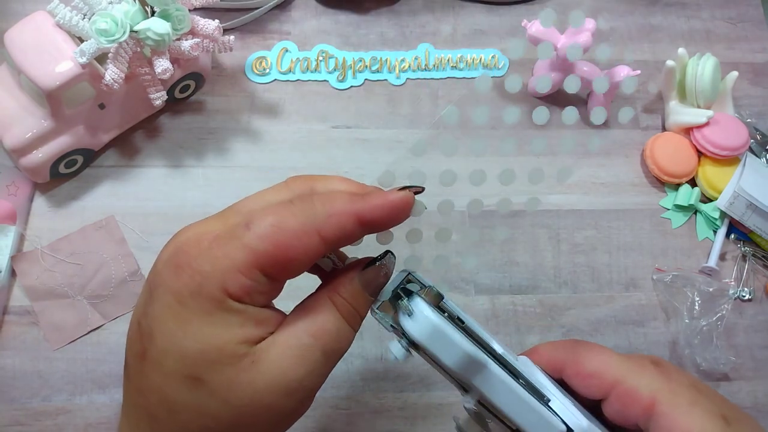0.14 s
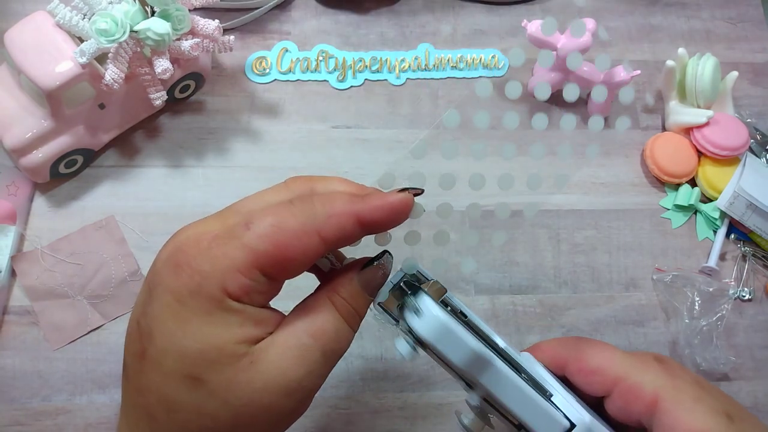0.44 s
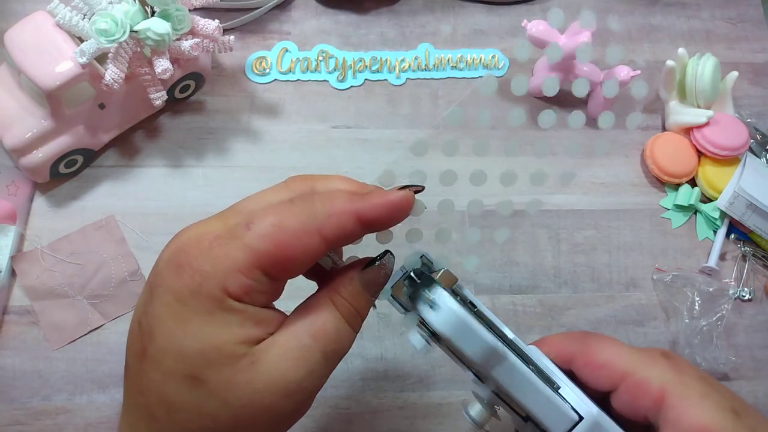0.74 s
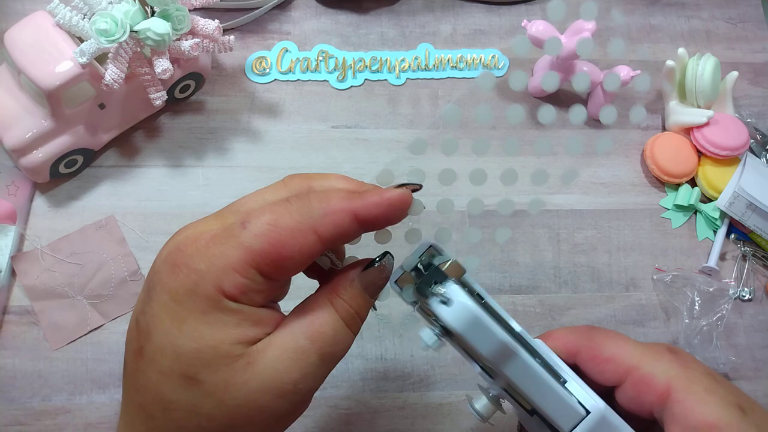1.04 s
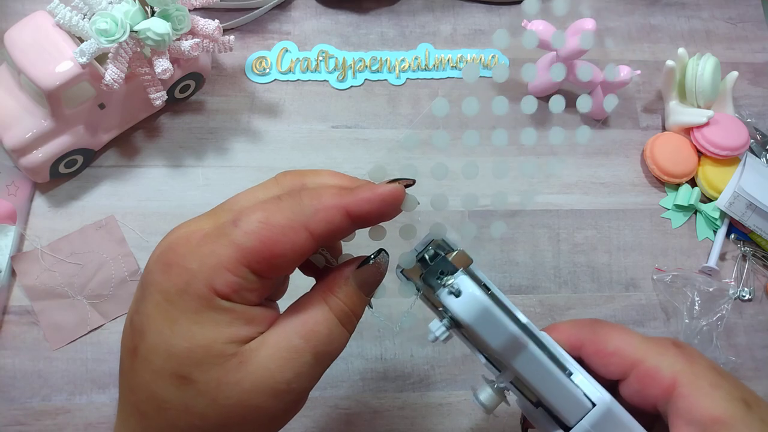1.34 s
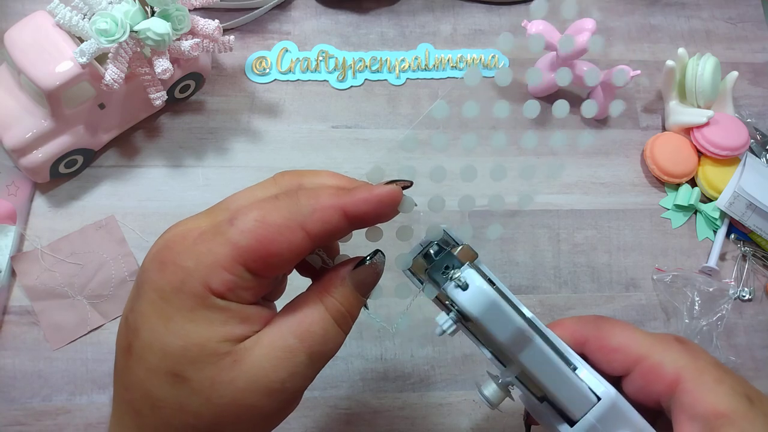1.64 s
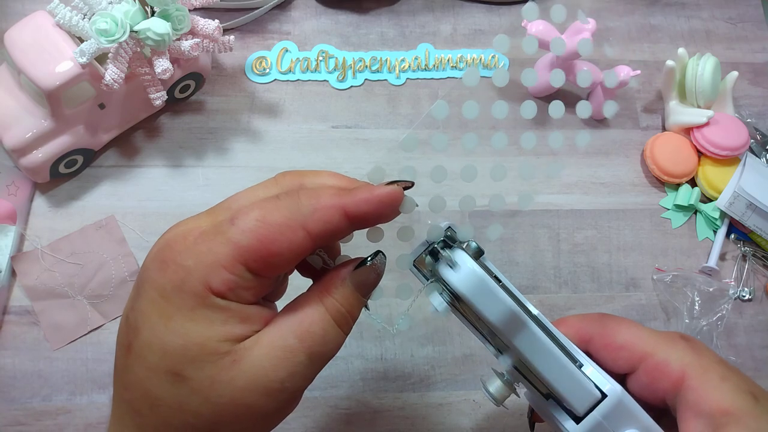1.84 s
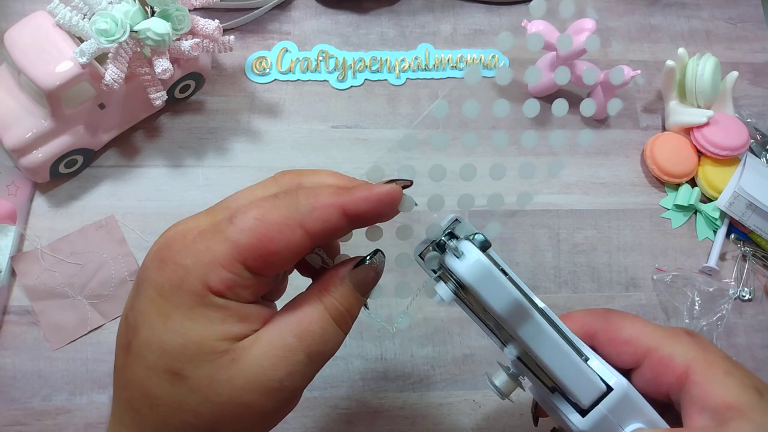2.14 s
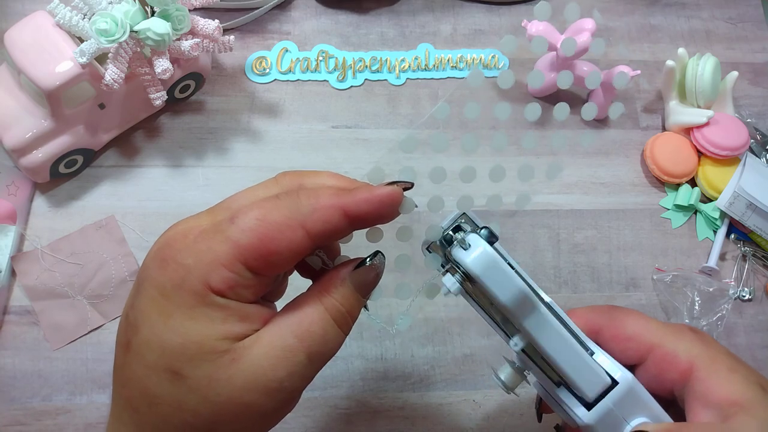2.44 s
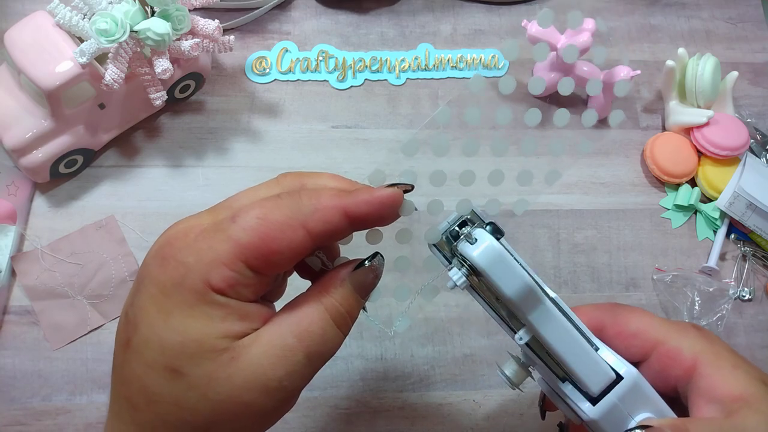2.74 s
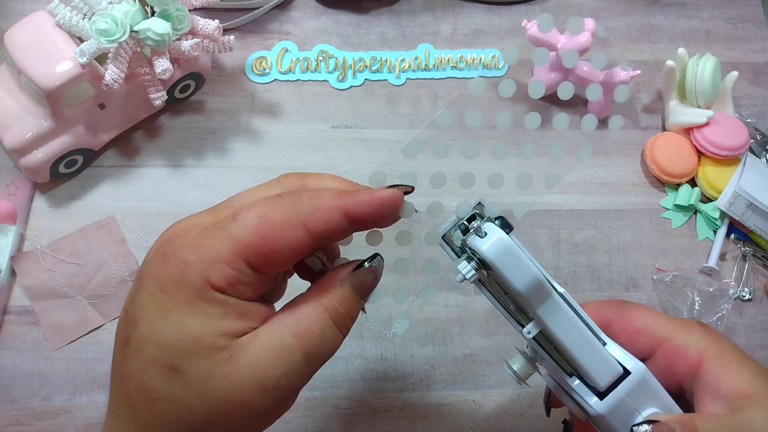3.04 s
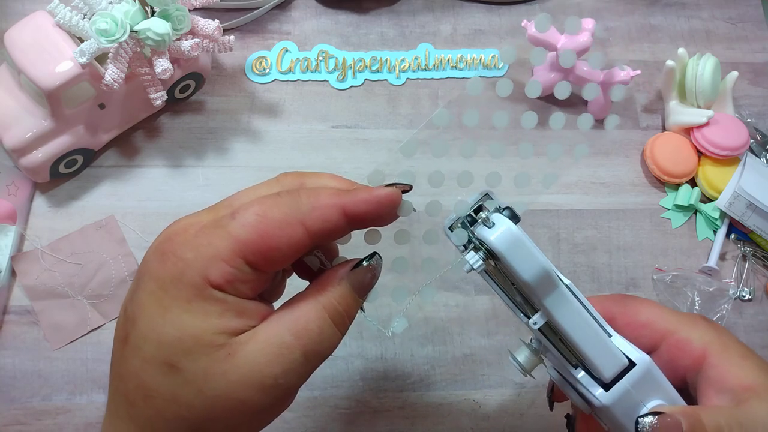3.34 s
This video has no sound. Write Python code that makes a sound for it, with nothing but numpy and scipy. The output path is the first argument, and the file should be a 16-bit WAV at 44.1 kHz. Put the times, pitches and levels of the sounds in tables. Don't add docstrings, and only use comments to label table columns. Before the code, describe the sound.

Close, dry indoor sound of a small motorized stitcher already running: rapid even clacking, a harsh nasal whine that surges and slackens, bright metallic chatter and faint low table rumble, continuing until the end.

```python
import sys
import numpy as np
from scipy import signal
from scipy.fft import rfft, irfft
from scipy.io import wavfile
from scipy.ndimage import uniform_filter1d

SR = 44100
rng = np.random.default_rng(int(sys.argv[2]) if len(sys.argv) > 2 else 0)


def unload_audio(sound):
    columns = np.transpose(np.atleast_2d(sound))
    steps = np.round(np.clip(columns, -1, 1) * 32767)
    wavfile.write(sys.argv[1], SR, steps.astype(np.int16))


def volts_from_decibels(level):
    exponent = np.asarray(level, float) / 20
    return 10 ** exponent


N = 154350
T = np.arange(N) / SR

# needle strike [t/s], strike [level/dB], downstroke whine [level/dB], upstroke whine [level/dB]
STITCHES = [(-0.0485, -37, -1, -4.5), (0.098, -22, -10.5, -10.5), (0.24, -5, -8, -5),
            (0.3878, -8, -7.5, -10.5), (0.531, -4.5, -7.5, -5), (0.6774, -3, -8, -16),
            (0.8199, -4, -8, -9.5), (0.9642, -4.5, -8.5, -10), (1.109, -4.5, -5.5, -9.5),
            (1.2537, -6, -8.5, -10.5), (1.3978, -87, -6.5, -8), (1.543, -5.5, -5, -7),
            (1.69, -30, -7.5, -8.5), (1.8352, -7, -9, -7), (1.981, -4, -6.5, -7.5),
            (2.1278, -4.5, -6.5, -6.5), (2.2742, -4, -9.5, -8), (2.4183, -11, -8, -6.5),
            (2.568, -6, -8.5, -6), (2.7145, -7, -7.5, -8), (2.8608, -6, -7.5, -12), (3.0053, -5, -8.5, -8),
            (3.1527, -6, -9.5, -7.5), (3.3009, -8, -10.5, -6.5), (3.45, -24, -10.5, -51)]
LEFT_LAG_S = .00017


def evened(x):
    return x / np.sqrt(np.mean(x ** 2) + 1e-20)


def read(points, hz):
    f, value = np.transpose(points)
    return np.interp(np.log(hz + 1), np.log(f + 1), value)


def wander(seconds):
    size = max(int(seconds * SR), 1)
    return evened(uniform_filter1d(uniform_filter1d(rng.standard_normal(N), size), size))


def strikes():
    strike_s = np.transpose(STITCHES)[0]
    last_stitch_s = 0.137
    return np.append(strike_s, strike_s[-1] + last_stitch_s)


def turns():
    return np.interp(T, strikes(), np.arange(len(STITCHES) + 1))


def bump(middle, length):
    away = (turns() - middle + .5) % 1 - .5
    return np.exp(-(2 * away / length) ** 4)


def table():
    # [f/Hz], [level/dB]
    rumble = [(15, -62), (25, -27.5), (281, -8), (343, -8), (398, -0.5), (449, -3.5), (535, -6.5),
              (620, 1.5), (810, -36), (1360, -120)]
    rumble_db, beat_db, alike = -43.5, 3.5, 0.89
    hz = np.fft.rfftfreq(N, 1 / SR)
    shared, left, right = rfft(rng.standard_normal((3, N)), axis=1)
    z = np.sqrt(alike) * shared + np.sqrt(1 - alike) * np.array([left, right])
    z = z * volts_from_decibels(read(rumble, hz)) * (hz < 700)
    return volts_from_decibels(rumble_db - 2 * beat_db * bump(0.6, 0.28)) * evened(irfft(z, N, axis=1))


def hums(rows, q, noisy, spread_db, drift_rad=.55):
    out = np.zeros((2, N))
    for hz, middle, length, db, pan_db in rows:
        slow_s = q / hz / 2
        swing = (1 - noisy) + noisy * (wander(slow_s) + 1j * wander(slow_s))
        stitch = np.floor(turns() - middle + 1.5).astype(int)
        mood = rng.standard_normal(len(STITCHES) + 3)[stitch]
        hum = swing * bump(middle, length) * volts_from_decibels(spread_db * np.clip(mood, -2, 1.3))
        drift = drift_rad * hz / 400 * wander(.06)
        hum *= np.exp(1j * (2 * np.pi * hz * T + drift))
        lag = np.exp(-2j * np.pi * hz * LEFT_LAG_S * (hz > 1000))
        port_db = db + np.array([[.5], [-.5]]) * pan_db
        out += volts_from_decibels(port_db) * np.array([hum * lag, hum]).real
    return out


def base_plate():
    # [f/Hz], middle [share of stitch], length [share of stitch], [level/dB], left-right [dB]
    notes_of_plate = [(404.6, .42, 0.43, -40.5, 5.5), (1323, 0.36, 0.27, -31, 0),
                      (898, 0.867, 0.13, -32.5, -7)]
    return hums(notes_of_plate, q=40, noisy=.05, spread_db=.8, drift_rad=.25)


def panels():
    # [f/Hz], middle [share of stitch], length [share of stitch], [level/dB], left-right [dB]
    shaken = [(814, 0.221, 0.092, -30, -13), (773, 0.489, 0.16, -30.5, -15.5),
              (737, 0.77, 0.068, -24, -7.5), (892, 0.836, 0.14, -28.5, -7.5), (779, 0.914, 0.22, -31.5, -6)]
    thumps = [(271, 0.913, 0.12, -45.5, 0), (291, 0.212, 0.12, -47, -2), (496, 0.243, 0.065, -37.5, 5),
              (510, 0.9, 0.44, -47.5, 3)]
    return hums(shaken + thumps, q=40, noisy=.2, spread_db=1.2)


def rasps():
    # [f/Hz], middle [share of stitch], length [share of stitch], [level/dB], left-right [dB]
    wide_parts = [(1313, 0.31, 0.28, -27.5, 4), (1190, 0.743, 0.15, -27.5, 1),
                  (2350, 0.34, 0.24, -29, 14.5), (2093, 0.816, .12, -24, 0.5), (1456, 0.51, 0.18, -35, 7),
                  (2810, 0.58, 0.22, -31, 15), (1640, 0.277, 0.05, -50, 9), (3170, 0.34, 0.28, -35.5, 16),
                  (691, 0.753, .14, -31.5, -1.5)]
    return hums(wide_parts, q=9, noisy=.8, spread_db=1.2)


def pings():
    # [f/Hz], middle [share of stitch], length [share of stitch], [level/dB], left-right [dB]
    metal_parts = [(8800, .22, 0.056, -34, 2), (8660, .39, 0.032, -29.5, 15), (8900, 0.21, 0.055, -24, 23),
                   (12800, 0.75, .06, -29.5, 15), (12200, 0.24, 0.053, -27, 12),
                   (13750, 0.97, .035, -23, 7), (6900, 0.042, 0.05, -27.5, -10), (9300, 1, 0.052, -27, -11),
                   (9900, 0.544, 0.059, -26, -12), (8160, 0.15, 0.036, -32, -11),
                   (11230, 0.9, 0.044, -35.5, 6), (4960, .22, 0.056, -34, 14),
                   (4930, .39, 0.066, -33.5, 10), (5020, 0.4, 0.035, -32, 20), (4200, 0.32, 0.043, -30, 1),
                   (4300, .4, 0.034, -25, 6), (4260, .55, 0.059, -30, 2), (14500, 0.2, .1, -39, 10),
                   (14500, .42, .1, -32, 12), (6300, 0.67, 0.015, -32.5, 0)]
    return hums(metal_parts, q=18, noisy=.8, spread_db=2)


def patchy(x):
    patch_db, patch_hz, patch_s = 1.71, 700, .008
    z = signal.stft(x, nperseg=256, noverlap=192)[2]
    field = rng.standard_normal(z.shape[1:])
    field = uniform_filter1d(field, max(int(patch_hz * 256 / SR), 1), axis=0)
    field = evened(uniform_filter1d(field, max(int(patch_s * SR / 64), 1), axis=1))
    return signal.istft(z * volts_from_decibels(patch_db * field), nperseg=256, noverlap=192)[1][:, :N]


def blows():
    # [share of stitch], length [s], level over the rattle [dB]
    knocks = [(0.238, 0.009, 1.5), (0.28, 0.0048, -17), (0.391, 0.0055, -3), (0.57, 0.005, -1),
              (0.742, 0.0036, 2)]
    knock_spread_db, knock_jitter_s = 1.8, 0.00079
    strike_length_s, strike_db = 0.0012, 14.5
    slack_at, slack_width, slack_db = 0.847, 0.13, -2.5
    flicker_db, flicker_s, swell_db = 1.25, 0.0021, .5
    s = strikes()
    hits = [(s[:-1], strike_length_s, strike_db + np.transpose(STITCHES)[1])]
    for share, length_s, db in knocks:
        chance = rng.standard_normal((len(STITCHES), 2))
        when = s[:-1] + share * np.diff(s) + knock_jitter_s * chance[:, 0]
        hits.append((when, length_s, db + knock_spread_db * np.clip(chance[:, 1], -2, 1)))
    power = np.ones(N)
    for when, length_s, db in hits:
        train = np.zeros(N)
        inside = (when > 0) & (when < T[-1])
        train[(when[inside] * SR).astype(int)] = volts_from_decibels(2 * db[inside])
        u = np.arange(-1000, 1001) / SR / length_s
        pulse = np.exp(-np.where(u < 0, 4 * u ** 2, 1.08 * u))
        power += signal.oaconvolve(train, pulse, "same")
    db = slack_db * bump(slack_at, 2 * slack_width)
    db = db + flicker_db * wander(flicker_s) + swell_db * wander(0.25)
    return np.sqrt(abs(power)) * volts_from_decibels(db)


def rattle():
    # [f/Hz], [level/dB]
    left_colour = [(500, -15.5), (700, -5), (1500, 1.5), (4500, 0), (7800, -6.5), (10300, -8.5),
                   (13300, -2), (15700, -2)]
    right_colour = [(500, -29.5), (720, -1), (1400, 0), (4200, 3), (6000, -3), (9000, 2), (13000, -9.5),
                    (15700, -8)]
    # [f/Hz], shared power [0..1]
    likeness = [(500, 0.94), (1000, 0.95), (1900, 0.34), (3000, 0.29), (4000, 0.33), (6000, 0.15),
                (12000, 0.22), (16000, 0.09)]
    # [f/Hz], width [Hz], left [dB], right [dB]
    case_modes = [(684, 97, 9, 5.5), (1802, 140, 7, 14), (3650, 250, 4, 3), (4180, 39, 3, 5.5),
                  (4830, 180, 1, -14), (7500, 630, 1, 0.5), (8800, 550, 8, -6), (9100, 360, -14, 4.5),
                  (11200, 480, 6, 2.5), (12600, 560, -2, 5.5), (14500, 350, 4.5, 3)]
    frame_rings = [(776, 45, 1.5, 2.5), (897, 25, 4, 5.5), (1305, 38, 6, 2), (1426, 33, 2, -2.5),
                   (2070, 55, 2, 0.5), (2287, 64, 5.5, 4.5), (2840, 50, 3.5, 1.5), (4239, 52, 1.5, 2),
                   (5009, 70, 3.5, 2), (5470, 40, 1, 3), (5760, 75, 4, 1.5), (9150, 100, 1, 2),
                   (11370, 65, 5, 3), (14490, 90, 4, 1)]
    # middle, length [share of stitch], [level/dB]
    loaded = [(.07, 0.16, -1), (.52, .26, -0.5)]
    bright_hz, dull_share = 3420, 0.23
    hz = np.fft.rfftfreq(N, 1 / SR)
    noise = patchy(rng.standard_normal((3, N)))
    push = blows()
    high = 1 / (1 + (bright_hz / (hz + 1)) ** 4)
    contact_db = sum(db * bump(at, length) for at, length, db in loaded)
    bright = rfft(push * noise, axis=1)
    dull = rfft(push ** dull_share * volts_from_decibels(contact_db) * noise, axis=1)
    shared, left, right = high * bright + (1 - high) * dull

    same = np.clip(read(likeness, hz), 0, 1)
    lag = np.array([np.exp(-2j * np.pi * hz * LEFT_LAG_S), 1 + 0 * hz])
    z = np.sqrt(same) * shared * lag + np.sqrt(1 - same) * np.array([left, right])
    db = np.array([read(left_colour, hz), read(right_colour, hz)])
    db = db - 40 * np.maximum(np.log2(500 / (hz + 1)), 0)
    for f, width_hz, left_db, right_db in case_modes + frame_rings:
        db += np.array([[left_db], [right_db]]) / (1 + (2 * (hz - f) / width_hz) ** 2)
    return volts_from_decibels(-15.5) * evened(irfft(z * volts_from_decibels(db), N, axis=1))


def gears():
    # [share of stitch], mesh [f/Hz], tooth load [level/dB]
    crank = [(0, 1838, 0.5), (.15, 1796, -1.5), (.2, 1915, -18), (.33, 1921, -12.5), (.38, 1824, -1.5),
             (.5, 1849, -1.5), (.63, 1835, -1.5), (.68, 1941, -20), (.8, 2038, -16), (.94, 1889, -15)]
    # [t/s], share of usual speed
    motor_speed = [(0, 1.004), (.3, 1), (.65, 1.008), (1.1, 1.005), (1.5, .997), (2, .995), (2.45, .992),
                   (2.85, 1.002), (3.15, .997), (3.5, .988)]
    # multiple, middle, length [share of stitch], left, right [dB], growth [dB/s]
    overtones = [(2, 0.903, .17, -28.5, -21.5, -1), (2, 0.743, 0.18, -31, -25.5, 1),
                 (2, 0.065, 0.15, -25.5, -24.5, -0.5), (2, 0.26, 0.17, -26, -25, -.5),
                 (2, 0.497, 0.33, -28.5, -26.5, 2.5), (3, 0.95, 0.058, -31, -28, 2),
                 (3, 0.079, 0.12, -30, -27, -2), (5, 0.66, .3, -41, -38, 4), (5, .05, .2, -42, -30, -2),
                 (6, 0.98, .08, -35, -28, 0), (6, .27, .12, -40, -38, 6), (8, .5, .3, -36, -44, 0),
                 (8, .07, .15, -36, -44, 0)]
    upstroke_swell_db = [-1.5, -2, -2, -5, -2.0, -1, 0, 0.7, 2, 2.5, 1, 3, -2.9, -2, 0, 1.4, 2, -0.1, -0.5,
                         0, 3, 2, -0.6, -1, 0.5]
    whine_db = [-6, -2.5]
    wobble_hz, flutter_db = 4, .7
    sing_hz, sing_reach_hz = 1830, 85
    whine_lag_rad, overtone_lag_rad = 1.71, 1.1

    share, mesh_hz, load_db = np.transpose(crank)
    hz, load_db = (uniform_filter1d(np.interp(turns(), share, v, period=1), size=120)
                   for v in (mesh_hz, load_db))
    speed = np.interp(T, *np.transpose(motor_speed))
    rows = np.array(STITCHES)
    stroke_at = (np.arange(len(rows))[:, None] + [.06, .52]).ravel()
    stroke_db = np.interp(turns(), stroke_at, rows[:, 2:].ravel())
    stitch = np.clip(turns().astype(int), 0, len(rows) - 1)
    swell_db = np.ravel(upstroke_swell_db)[stitch]
    stroke_db = stroke_db + swell_db * bump(.5, .34) * (turns() % 1 - .51) / .15

    angle = 2 * np.pi * np.cumsum(speed * hz + wobble_hz * wander(0.0062)) / SR
    whine = volts_from_decibels(load_db + stroke_db + flutter_db * wander(0.011))
    held_hz = sing_hz + sing_reach_hz * np.tanh((hz - sing_hz) / sing_reach_hz)
    sung = angle + 2 * np.pi * np.cumsum(held_hz - hz) / SR
    ports = np.array([np.sin(sung - whine_lag_rad), np.sin(sung)])
    out = whine * volts_from_decibels(np.array(whine_db))[:, None] * ports
    for k, middle, length, left_db, right_db, growth_db in overtones:
        tone = bump(middle, length) * volts_from_decibels(2.1 * wander(0.012) + growth_db * (T - T[-1] / 2))
        left = volts_from_decibels(left_db) * np.sin(round(k) * angle - overtone_lag_rad)
        right = volts_from_decibels(right_db) * np.sin(round(k) * angle)
        out += tone * np.array([left, right])
    return out


def scene():
    case = base_plate() + panels() + rasps()
    return table() + case + pings() + rattle() + gears()


def low_pass(x):
    return signal.sosfilt(signal.butter(12, 16860, fs=SR, output="sos"), x)


def record(dry):
    lowpass = signal.firwin(1001, 15770, window=("kaiser", 9), fs=SR)
    mix = signal.oaconvolve(np.clip(dry, -.95, .95), lowpass[None], "same")
    return low_pass(mix)


dry = scene()
out = record(dry)
unload_audio(out)
```